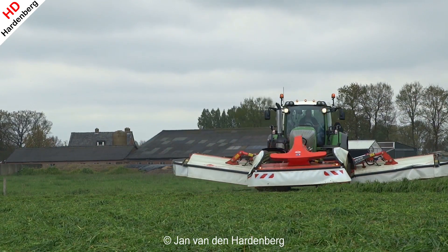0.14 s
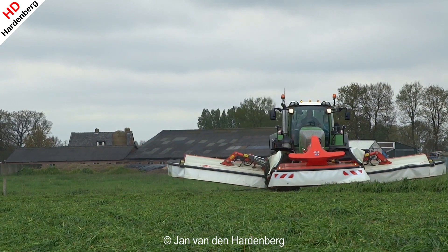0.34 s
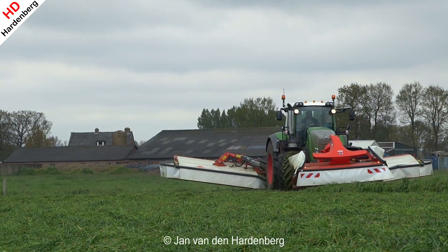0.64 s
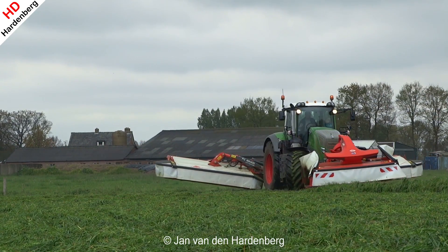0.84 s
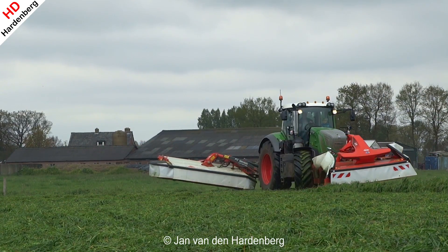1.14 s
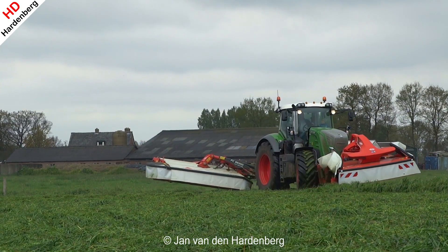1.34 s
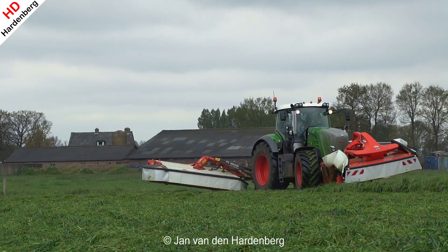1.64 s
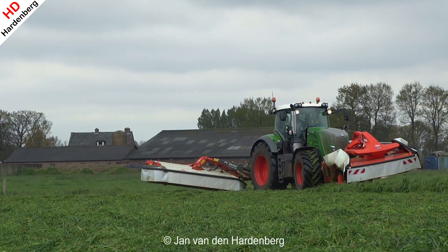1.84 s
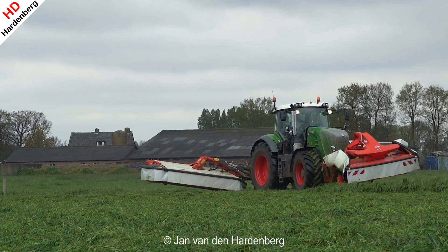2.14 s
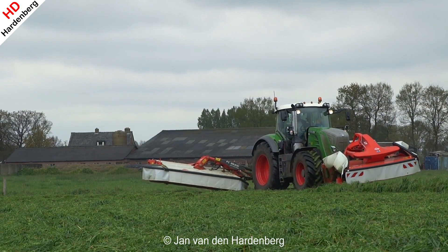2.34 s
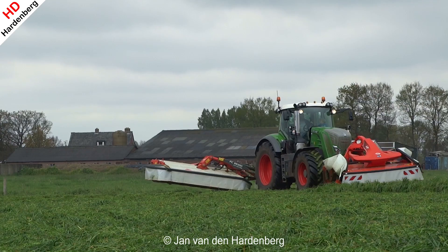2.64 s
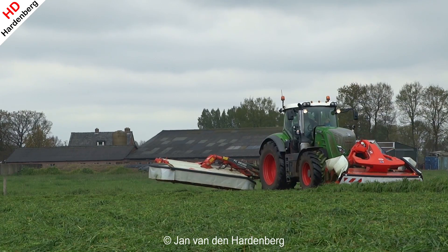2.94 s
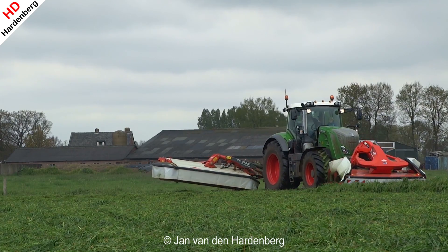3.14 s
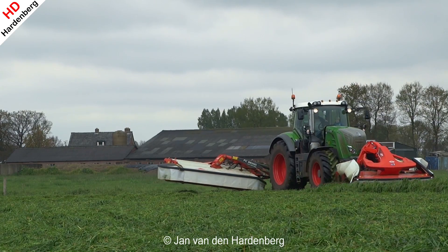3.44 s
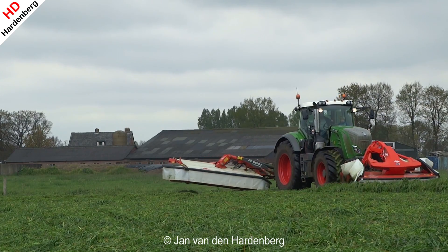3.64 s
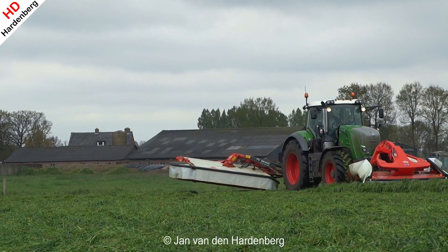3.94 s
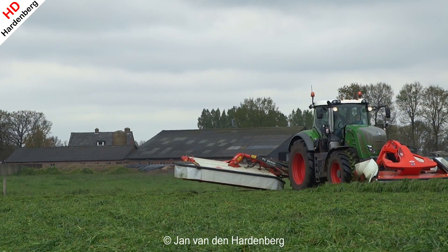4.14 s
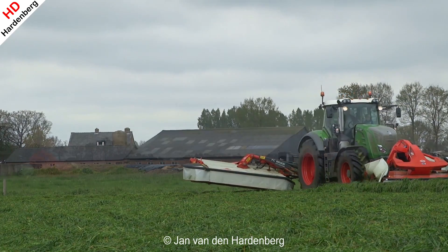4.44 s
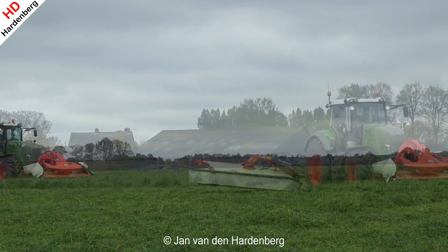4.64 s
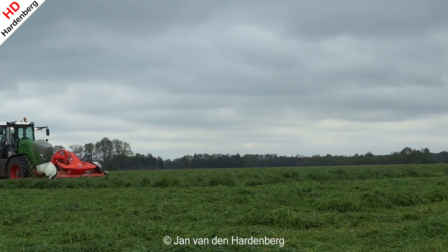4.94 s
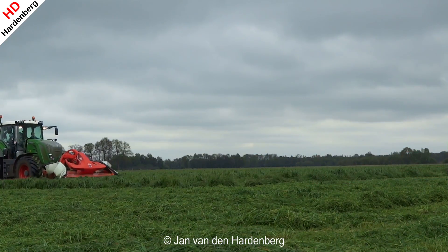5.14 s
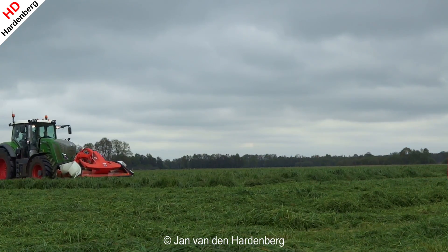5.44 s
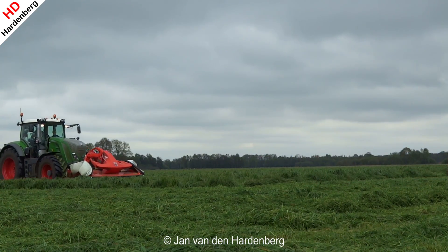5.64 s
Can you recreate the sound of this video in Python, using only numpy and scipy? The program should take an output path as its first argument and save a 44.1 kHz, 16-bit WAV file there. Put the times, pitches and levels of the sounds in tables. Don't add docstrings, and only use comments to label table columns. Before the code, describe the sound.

A tractor with whirring disc mowers turns at a distance while a bird chirps, then crossfades to a much louder, closer grass-cutting hiss.

```python
import sys
import numpy as np
from scipy import signal
from scipy.fft import rfft, irfft
from scipy.io import wavfile
from scipy.ndimage import uniform_filter1d

SR = 44100
rng = np.random.default_rng(int(sys.argv[2]) if len(sys.argv) > 2 else 0)


def store_wav(level_fs):
    pcm = np.round(np.clip(np.atleast_2d(level_fs), -1, 1) * 32767)
    wavfile.write(sys.argv[1], SR, pcm.T.astype(np.int16))


def gain_from_db(level_db):
    decades = np.asarray(level_db, float) / 20
    return 10 ** decades


N = 255339
TIME = np.arange(N) / SR
HOP, FRAME = 128, 512
FADE_OUT_S = (4.47, 4.8)
FADE_IN_S = (4.469, 4.891)


def evened(x):
    return x / np.sqrt(np.mean(x ** 2) + 1e-20)


def read(points, hz):
    f, value = np.transpose(points)
    return np.interp(np.log(hz + 1), np.log(f + 1), value)


def wander(rate_hz, t):
    speeds_hz = np.geomspace(rate_hz / 20, rate_hz, num=24)
    return evened(sum(np.sin(2 * np.pi * (f * t + rng.random())) / np.sqrt(f) for f in speeds_hz))


def inside(start_s, end_s, edge_s, t=TIME):
    return np.clip(np.minimum(t - start_s, end_s - t) / edge_s + 1, 0, 1)


def tone(hz, db):
    return np.sqrt(2) * gain_from_db(db) * np.sin(2 * np.pi * (np.cumsum(hz) / SR + rng.random()))


def coloured(colour, db):
    shape = gain_from_db(read(colour, np.fft.rfftfreq(N, 1 / SR)))
    return gain_from_db(db) * evened(irfft(rfft(rng.standard_normal(N)) * shape, N))


# pitch_hz, echo_share
FAR_GROUND = [(500, 0.17), (4000, 0.077), (6000, 0.036), (7500, 0.34), (12000, 0.97)]
NEAR_GROUND = [(500, 0.11), (4000, 0.082), (5300, 0.021), (7500, .25), (9000, 0.36), (15000, .4)]


def ground_comb_db(ground, hz, hardness, comb_hz, shifts_hz, squeeze):
    low_turns = (hz - shifts_hz[0]) / comb_hz
    treble_turns = (hz - shifts_hz[1]) / (squeeze * comb_hz)
    turns = np.where(hz < 8500, low_turns, treble_turns)
    echo = np.clip(read(ground, hz) * hardness, 0, .9)
    return 10 * np.log10((1 + echo ** 2 + 2 * echo * np.cos(2 * np.pi * turns)) / (1 + echo ** 2))


# pitch_hz, width_hz, level_db
FAR_GUARDS = [(3515, 540, 4.5), (2550, 170, -1.3), (7900, 1100, -1.5), (6800, 310, 1.5), (5540, 300, 2),
              (3100, 360, -3.5)]
NEAR_GUARDS = [(3244, 196, 5), (2280, 240, 3.2), (7940, 3500, 3.9), (4100, 160, 2.8)]


def guard_ring_db(guards, hz, hardness):
    return hardness ** .75 * sum(db / (1 + (2 * (hz - f) / width) ** 2) for f, width, db in guards)


def repeat_passes(hiss, knife_hz, repeat, chop):
    again = 0
    for k in range(1, 5):
        earlier = np.maximum(np.arange(N) - np.round(k * SR / knife_hz), 0).astype(int)
        again = again + repeat ** ((k + 1) / 2) * hiss[:, earlier]
    chopped = 1 + chop * np.cos(2 * np.pi * np.cumsum(knife_hz) / SR)
    return (hiss + again) / np.sqrt(1 + repeat ** 2 / (1 - repeat)) * chopped


# time_s, hiss_db, roar_re_hiss_db
FAR_CUT = [(0, -36.5, 1.5), (.25, -39, 1), (.7, -40, 0.5), (1.08, -39.5, -2), (1.3, -37.5, -4),
           (1.7, -38.5, -1), (1.95, -40, -0.5), (2.5, -42, 1), (2.85, -44.5, 2.5), (3.3, -44, -1),
           (3.8, -44, 2.5), (4.499, -43.5, 2)]
NEAR_CUT = [(4.5, -23, 0), (5.0, -24.5, -1), (5.27, -24.5, .3), (5.45, -23.5, -0.1), (5.79, -24, 2.5)]
# time_s, knife_rate_hz, repeat_share, ground_hardness_factor, aside_factor
FAR_DISCS = [(0, 102.1, 0.15, 1.17, 0.37), (1.2, 101.9, 0.2, 0.89, 0.53), (1.8, 103, 0.25, 0.91, 0.61),
             (2.3, 102.1, 0.19, 0.95, 1.1), (2.9, 99.6, 0.2, 0.68, 0.84), (3.5, 99.2, 0.13, 0.52, 0.92),
             (4.6, 98, 0.24, 0.54, 1.55)]
NEAR_DISCS = [(4.55, 91.86, 0.051, 1.22, 1.45), (5.79, 93, 0.084, 1.35, 0.79)]
# pitch_hz, level_db_per_hz
FAR_COLOUR = [(250, -69), (430, -32.5), (600, -24.5), (900, -10), (2050, -4.5), (3500, -4.5), (5140, -12),
              (7900, -9), (8700, -16), (10200, -27.5), (11400, -36.5), (12000, -49), (13200, -60),
              (15500, -70)]
NEAR_COLOUR = [(250, -45), (430, -24.5), (555, -11.5), (749, -3.5), (1470, 0), (1790, 2), (2240, -0.5),
               (2800, -0.5), (3160, 2.5), (4530, -0.5), (7210, 0.5), (10200, -10.5), (15500, -36)]
# pitch_hz, level_db
FAR_SIDE = [(150, -48), (380, -8), (950, -17), (2400, -21.5), (4300, -21.5), (7000, -28), (8500, -35),
            (9500, -13), (11000, -12), (12200, -30)]
NEAR_SIDE = [(150, -55), (400, -19), (950, -22), (1900, -33), (3500, -15.5), (5200, -20), (6300, -40),
             (8500, -36), (9300, -15), (11000, -13), (12200, -30)]
# pitch_hz, left_minus_right_db
FAR_LEAN = [(60, 0.0), (180, 0.0), (550, -2), (1650, -2), (4970, -1.75), (15000, 0.2)]
NEAR_LEAN = [(60, 0.0), (180, 0.0), (550, 0.64), (1650, 0.67), (4970, 0.83), (15000, 0.0)]


def cutting(rows, discs, colour, guards, ground, side, lean, comb_start_hz, comb_hz_per_s,
            fizz_db, air_db, shifts_hz, squeeze, patchy_db, gust_db, chop):
    t = np.arange(N // HOP + 5) * HOP / SR
    hz = np.fft.rfftfreq(FRAME, 1 / SR)[:, None]
    cut_s, *columns = np.transpose(rows)
    hiss_db, roar_db = (np.interp(t, cut_s, c) for c in columns)
    disc_s, knife_hz, repeat, hardness, aside = np.transpose(discs)
    hardness, aside = np.interp(t, disc_s, hardness), np.interp(t, disc_s, aside)
    a, b, c, d, patches = rng.standard_normal((len(t), len(hz), 5)).T
    patches = uniform_filter1d(patches, size=5, axis=0)
    patches = evened(uniform_filter1d(patches, size=20, axis=1))

    field_db = read(colour, hz) + patchy_db * patches + gust_db * wander(30, t)
    comb_hz = comb_start_hz + comb_hz_per_s * np.maximum(t - cut_s[0], 0)
    field_db += ground_comb_db(ground, hz, hardness, comb_hz, shifts_hz, squeeze)
    field_db += guard_ring_db(guards, hz, hardness)
    heard = t >= cut_s[0]
    fizz_db = fizz_db * aside
    air_db = air_db * aside + 1.5 * wander(25, t)
    for change_db, low_hz, high_hz in ((roar_db, 0, 1500), (fizz_db, 5000, 9500), (air_db, 9500, SR)):
        band = ((hz >= low_hz) & (hz < high_hz)) * 1.
        share = uniform_filter1d(band, size=15, axis=0)
        field_db += share * (change_db - np.median(change_db[heard]))

    level = gain_from_db(field_db)
    core = (hz[:, 0] > 1500) & (hz[:, 0] < 5000)
    level *= gain_from_db(hiss_db) / np.sqrt(np.mean(level[core] ** 2) * core.mean())
    mid = a + 1j * b
    apart = gain_from_db(read(side, hz)) * (c + 1j * d)
    lean_db = read(lean, hz) * aside / 2
    z = level * np.array([(mid + apart) * gain_from_db(lean_db), (mid - apart) * gain_from_db(-lean_db)])
    unit = np.std(signal.istft(mid, nperseg=FRAME, noverlap=FRAME - HOP)[1])
    hiss = signal.istft(z, nperseg=FRAME, noverlap=FRAME - HOP)[1][:, :N] / unit
    knife_hz = np.interp(TIME, disc_s, knife_hz)
    repeat = np.clip(np.interp(TIME, disc_s, repeat), 0, .8)
    return repeat_passes(hiss, knife_hz, repeat, chop)


# time_s, fast_knife_rate_hz, slow_set_lag_hz, fast_db, slow_db
FAR_SETS = [(0.0, 102.23, 2.67, -42.8, -49.6), (0.1, 102.35, 2.36, -37.2, -47.0),
            (0.33, 101.5, 2.06, -50.3, -52.4), (0.52, 101.82, 2.86, -39.9, -48.9),
            (0.87, 102.65, 3.87, -55.8, -52.4), (1.1, 101.85, 4.42, -44.5, -67.7),
            (1.28, 102.16, 3.68, -43.3, -57.8), (1.55, 103.39, 3.87, -53.0, -52.6),
            (1.8, 103.3, 3.44, -45.6, -54.5), (2.2, 102.64, 3.0, -42.7, -55.8),
            (2.6, 101.72, 2.77, -45.2, -54.0), (3.0, 99.97, 2.24, -46.8, -56.1),
            (3.45, 99.06, 3.13, -49.0, -62.8), (3.85, 98.84, 2.94, -44.6, -63.8),
            (4.05, 99.07, 2.99, -46.8, -62.2), (4.25, 99.07, 2.98, -44.7, -62.6),
            (4.62, 99.5, 2.96, -48.8, -62.0)]
NEAR_SETS = [(4.72, 95.36, 2.57, -60.6, -52.3), (4.88, 95.4, 2.61, -54.7, -50.8),
             (5.05, 94.95, 3.32, -46.2, -45.9), (5.2, 94.96, 2.28, -56.2, -46.7),
             (5.35, 95.22, 2.95, -48.4, -54.3), (5.45, 95.2, 2.74, -56.5, -59.9),
             (5.58, 94.52, 3.06, -40.7, -42.6), (5.78, 95.0, 3.11, -58.4, -61.2)]
# time_s, fast_db, slow_db
FAR_KNIVES = [(0, -68, -60.5), (.4, -59, -65), (1.3, -55, -62), (1.75, -69.5, -60.5), (2.3, -64, -60),
              (3.0, -81, -62), (4.6, -71, -63.5)]
NEAR_KNIVES = [(4.6, -54, -53.5), (5.3, -54, -50), (5.79, -52, -46.5)]
FAR_LEAD = (.005, -.148)
NEAR_LEAD = (.47, .325)


def beating(sets, knives, lead):
    s, *columns = np.transpose(sets)
    fast_hz, lag_hz, *twice_db = (np.interp(TIME, s, c) for c in columns)
    knives_s, *columns = np.transpose(knives)
    once_db = [np.interp(TIME, knives_s, c) for c in columns]
    turns = np.cumsum([fast_hz, fast_hz - lag_hz], axis=1) / SR
    turns -= turns[:, [round(s[0] * SR)]]
    out = np.zeros(N)
    for k, (fast_db, slow_db), ahead in zip((1, 2), (once_db, twice_db), lead):
        start = rng.random()
        out += gain_from_db(fast_db) * np.sin(2 * np.pi * (k * turns[0] + start + ahead))
        out += gain_from_db(slow_db) * np.sin(2 * np.pi * (k * turns[1] + start))
    return np.sqrt(2) * out


# knife_rate_multiple, level_db
FAR_ORDERS = [(6, -79), (8, -76), (9, -77), (10, -75), (2.5, -79), (4.85, -84), (.5, -77), (.75, -79)]
NEAR_ORDERS = [(6, -62), (8, -55), (3, -60), (2.75, -61)]


def overtones(discs, orders, load, waver_db):
    s, knife_hz, _, hardness, _ = np.transpose(discs)
    knife_hz = np.interp(TIME, s, knife_hz)
    load_s, load_db = np.transpose(load)[:2]
    swell_db = np.interp(TIME, load_s, load_db - np.median(load_db))
    faint = np.zeros(N)
    for multiple, db in orders:
        faint += tone(multiple * knife_hz, db + swell_db + waver_db * wander(16, TIME))
    return np.interp(TIME, s, hardness) * faint


# time_s, pitch_hz, level_db
FAR_FIRING = [(0, 117.3, -60), (.5, 117.5, -62), (.9, 118.9, -60.5), (2.3, 124.7, -59.5), (4.0, 122.4, -61),
              (4.6, 121.3, -54)]
NEAR_FIRING = [(4.6, 122.6, -52), (5.79, 121.7, -52)]
# pitch_hz, level_db_per_hz
FAR_RUMBLE = [(12, -70), (20, -35), (102, -15), (150, 4.5), (199, 1), (226, -8), (254, -4.5), (393, -27),
              (430, -39), (560, -67), (950, -120)]
NEAR_RUMBLE = [(12, -64), (20, -34), (37, -28), (57, -26), (88, -14), (168, 2), (318, -6), (365, -8),
               (424, -37), (520, -20), (680, -45), (1140, -120)]


def engine(firing, rumble, rumble_db):
    s, hz, db = np.transpose(firing)
    hz, db = np.interp(TIME, s, hz), np.interp(TIME, s, db)
    half = tone(hz / 2, db - 17.5 + 2.6 * wander(30.4, TIME))
    full = tone(hz, db + 2.6 * wander(40, TIME))
    return full + half + coloured(rumble, rumble_db)


def far_upper_tone():
    s, fast_hz, _, fast_db, _ = np.transpose(FAR_SETS)
    upper_hz = 2 * np.interp(TIME, s, fast_hz) + 187.6
    return tone(upper_hz, np.interp(TIME, s, fast_db) - 29)


# pitch_hz, first_db, swell_db_per_s, waver_db
NEAR_GEARS = [
    (361.5, -59.5, 8, 5),
    (162.2, -50.5, 1.5, 2),
]


def near_mesh():
    out = np.zeros(N)
    for hz, db, swell_db_per_s, waver_db in NEAR_GEARS:
        drift_hz = hz + 2.9 * wander(30, TIME)
        swell_db = swell_db_per_s * (TIME - FADE_IN_S[1])
        out += tone(drift_hz, db + swell_db + waver_db * wander(40, TIME))
    return out


# start_s, end_s, pitch_hz, width_hz, level_db
WHINES = [
    (3.93, 4.25, 1047, 6, -56),
    (4.2, 4.68, 1050, 6, -51),
    (4.78, 5.08, 2285, 25, -39),
    (5.2, 5.79, 2007, 30, -46),
]


def gear_whines():
    out = np.zeros(N)
    for start_s, end_s, hz, width_hz, db in WHINES:
        drift_hz = hz + width_hz / 2 * wander(40, TIME)
        whine = tone(drift_hz, db + 2.2 * wander(15, TIME))
        out += inside(start_s + .1, end_s - .1, .1) * whine
    return out


# pitch_hz, level_db_per_hz
PUFF = [(7000, -40), (9000, 3), (11500, 0), (13300, -7), (14300, -22), (16000, -50)]


def puff():
    after_s = TIME - 3.85
    rise_db = 85 * np.minimum(after_s, 0)
    fall_db = 20 * np.sqrt(np.maximum(after_s, 0))
    return coloured(PUFF, -65 + rise_db - fall_db)


# start_s, length_s, first_hz, last_hz, level_db, rise_power
BIRD = [
    (.615, .055, 3420, 4150, -44.5, 1.1),
    (1.566, .057, 3450, 4240, -40.5, 1.1),
    (2.418, .064, 3370, 4240, -39.5, 1.8),
    (3.198, .08, 3360, 4080, -42, 1.7),
]


def bird():
    out = np.zeros(N)
    for start_s, length_s, first_hz, last_hz, db, bend in BIRD:
        u = np.clip((TIME - start_s) / length_s, 0, 1)
        hook = np.clip((TIME - start_s - length_s) / .016, 0, 1)
        hz = first_hz + (last_hz - first_hz) * (u ** bend - .7 * hook)
        swell = np.sin(np.pi * .83 * u) ** .7 * (1 - hook ** 2)
        out += tone(hz, db) * swell
    out += gain_from_db(-10) * np.roll(out, round(.03 * SR))
    return out * gain_from_db(np.array([[1.6], [-1.6]]))


def fades():
    fade_out = inside(0, FADE_OUT_S[0], FADE_OUT_S[1] - FADE_OUT_S[0])
    fade_in = inside(FADE_IN_S[1], 9, FADE_IN_S[1] - FADE_IN_S[0])
    return fade_out, fade_in


def scene():
    far = cutting(FAR_CUT, FAR_DISCS, FAR_COLOUR, FAR_GUARDS, FAR_GROUND, FAR_SIDE, FAR_LEAN,
                  comb_start_hz=1115, comb_hz_per_s=-6.5, fizz_db=-2.8, air_db=-6.5,
                  shifts_hz=(200, 290), squeeze=1.0, patchy_db=0.8, gust_db=0.1, chop=.05)
    far += overtones(FAR_DISCS, FAR_ORDERS, FAR_CUT, waver_db=3.4)
    far += engine(FAR_FIRING, FAR_RUMBLE, rumble_db=-59.5)
    far += far_upper_tone() + puff()
    near = cutting(NEAR_CUT, NEAR_DISCS, NEAR_COLOUR, NEAR_GUARDS, NEAR_GROUND, NEAR_SIDE, NEAR_LEAN,
                   comb_start_hz=1033, comb_hz_per_s=-30, fizz_db=-3.5, air_db=-4.5,
                   shifts_hz=(215, 545), squeeze=.94, patchy_db=0.6, gust_db=0.08, chop=0.065)
    near += overtones(NEAR_DISCS, NEAR_ORDERS, NEAR_CUT, waver_db=4.0)
    near += engine(NEAR_FIRING, NEAR_RUMBLE, rumble_db=-45.5)
    near += near_mesh()
    far_hum = beating(FAR_SETS, FAR_KNIVES, FAR_LEAD) * inside(0, FAR_SETS[-1][0], 0.11)
    near_hum = beating(NEAR_SETS, NEAR_KNIVES, NEAR_LEAD) * inside(NEAR_SETS[0][0], 9, 0.21)
    fade_out, fade_in = fades()
    return far * fade_out + near * fade_in + far_hum + near_hum + gear_whines() + bird()


def band_limit(x):
    return signal.sosfilt(signal.butter(12, 15700, fs=SR, output="sos"), x)


def record(dry):
    return band_limit(dry)


dry = scene()
out = record(dry)
store_wav(out)
```